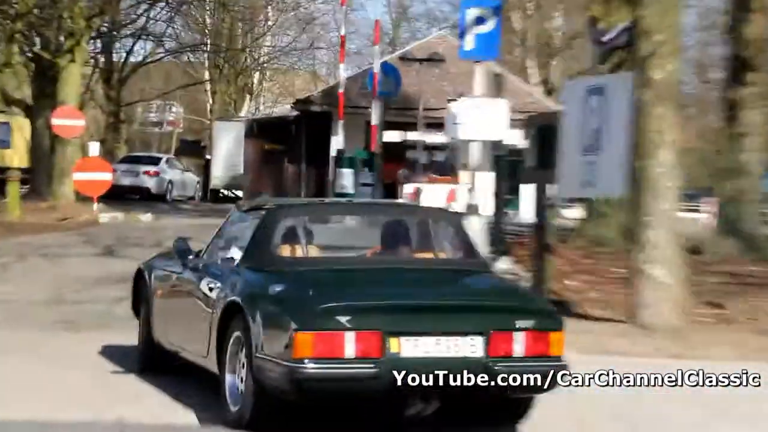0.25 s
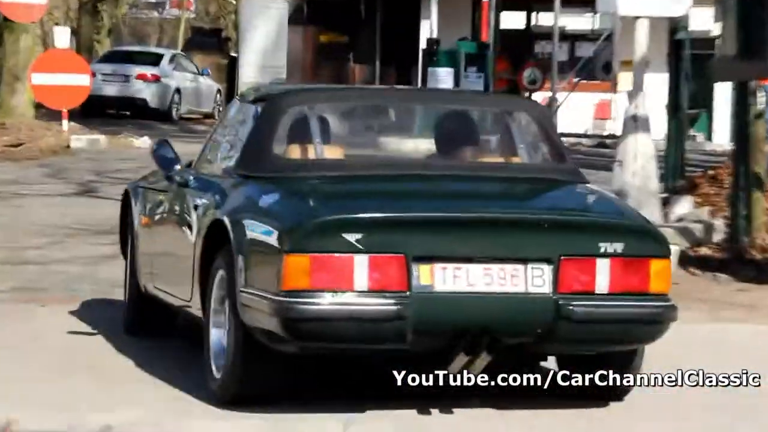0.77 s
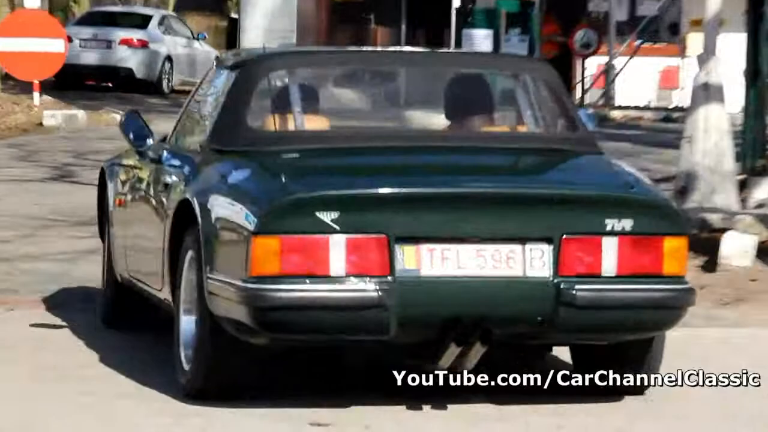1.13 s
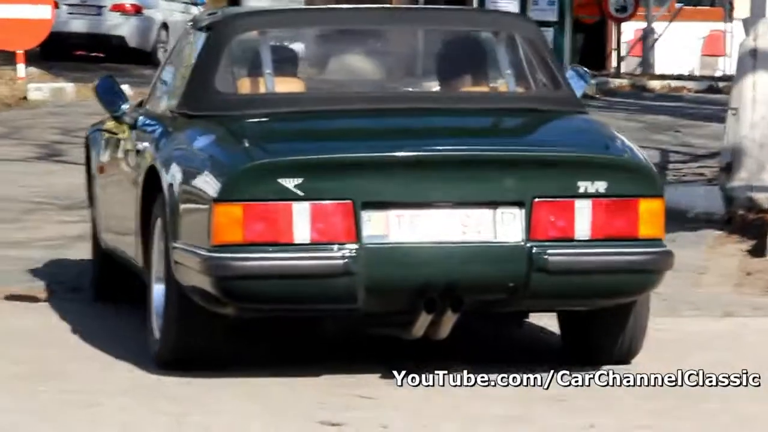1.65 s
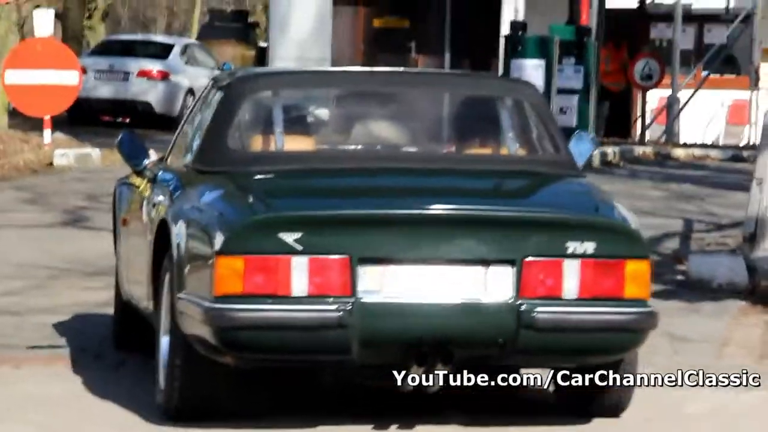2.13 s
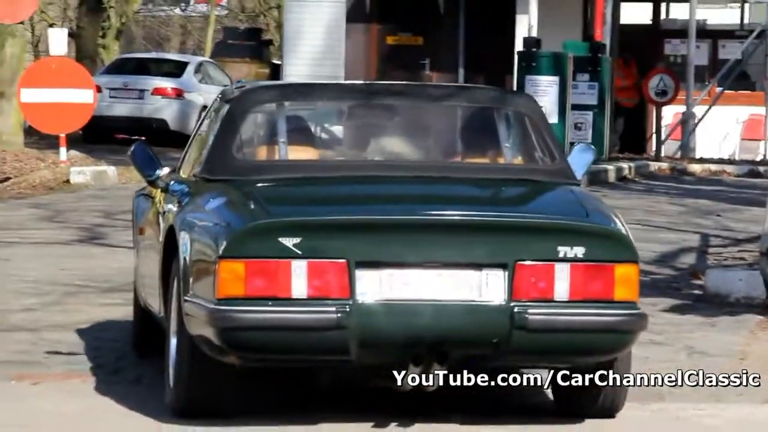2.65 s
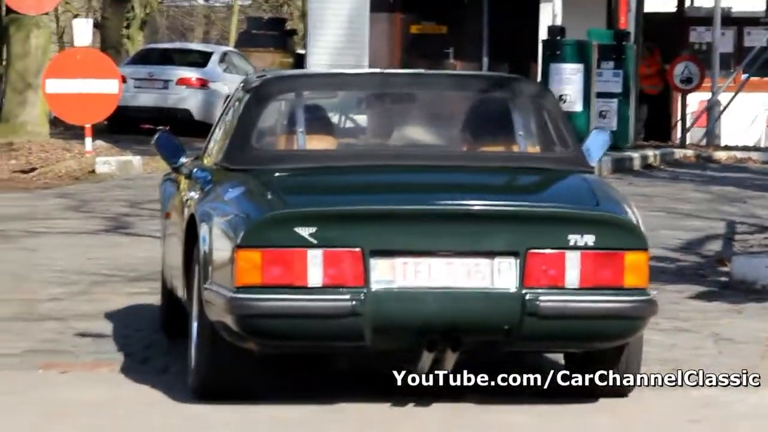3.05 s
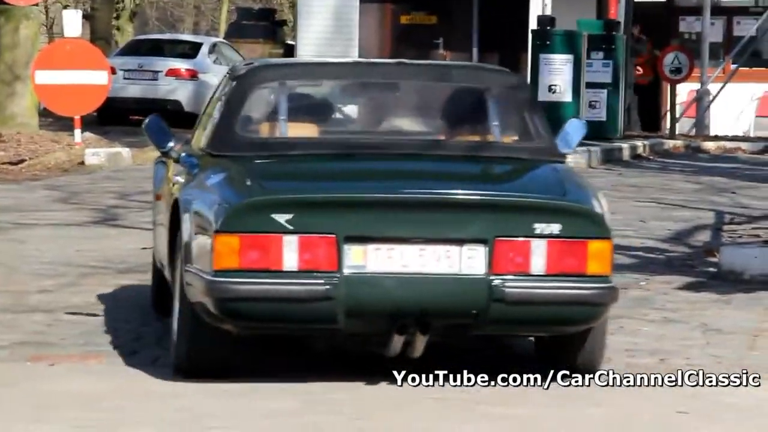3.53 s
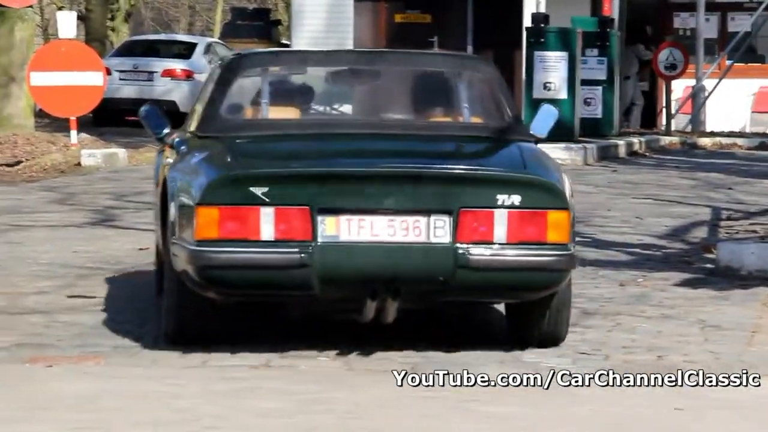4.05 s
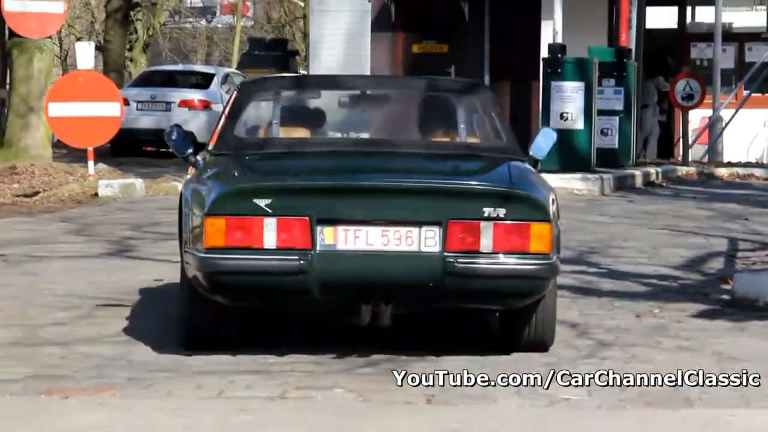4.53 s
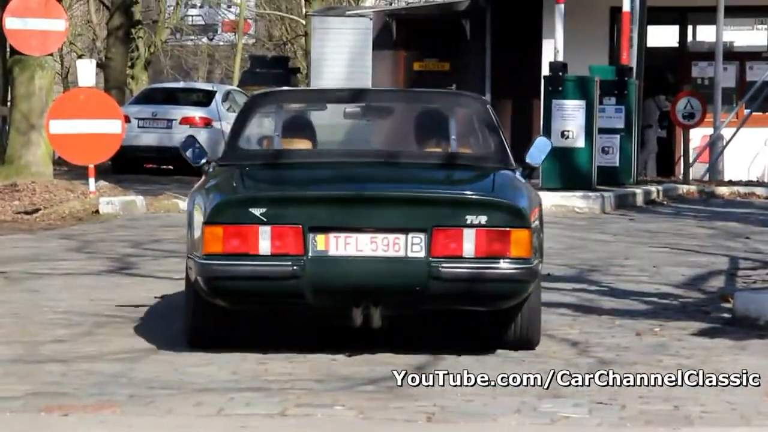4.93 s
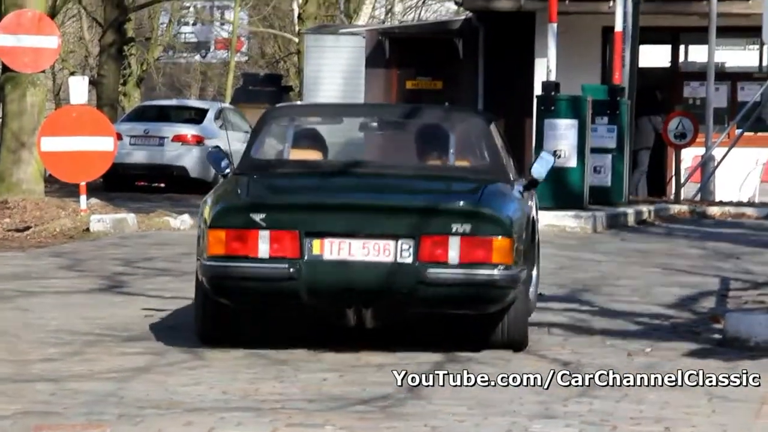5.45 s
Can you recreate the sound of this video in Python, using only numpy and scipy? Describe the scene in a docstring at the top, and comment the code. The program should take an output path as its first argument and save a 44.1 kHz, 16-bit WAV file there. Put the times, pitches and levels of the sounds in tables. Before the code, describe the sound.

At an outdoor roadside, a six-cylinder sports car burbles straight ahead, its uneven exhaust booming over lightly ticking valves. Another car passes close behind the stereo microphone on the left, with tyre roar and a brief coarse rasp. The sports car revs up, drops back, then revs again and rolls away at steady revs. Traffic noise drifts to the right while light wind rumbles on the microphone.

```python
"""At a roadside, a stereo microphone faces a six-cylinder sports car, its uneven firings booming in the
twin exhaust over ticking valve gear. From the start, light wind rumbles on the two microphone ports and
tyres roar close behind on the left, with a coarse rasp, a thin whine and a low hum, all gone in a second.
The sports car blips its throttle near 1.8 s and again near 4 s, then rolls away, while the traffic
crosses to the right. Just after 5 s a faint tick sounds on the left."""
import sys
import numpy as np
from scipy import signal
from scipy.io import wavfile
from scipy.ndimage import uniform_filter1d

SR = 44100
rng = np.random.default_rng(int(sys.argv[2]) if len(sys.argv) > 2 else 0)


def wav_record(signal):
    """Record a signal, one row per channel, as 16-bit PCM in the file named by sys.argv[1]."""
    frames = np.transpose(np.atleast_2d(signal))
    bounded = np.clip(frames, -1, 1)
    # unit amplitude maps onto the largest positive 16-bit level
    quanta = np.round(bounded * 32767).astype(np.int16)
    wavfile.write(sys.argv[1], SR, quanta)


N = 250488

# The sports car, straight ahead. Levels in all tables are relative.
# Engine speed. Each row: time in seconds, firings per second.
FIRING_RATE = [(0.0, 71), (0.22, 59), (0.42, 53.4), (0.54, 52), (0.9, 46), (1.07, 51.5), (1.25, 69),
               (1.41, 80.5), (1.48, 91), (1.58, 100), (1.7, 109), (1.8, 112.5), (1.88, 111.5), (1.99, 103),
               (2.12, 92), (2.24, 81.5), (2.37, 72), (2.59, 62), (2.83, 57), (3.03, 53), (3.16, 78),
               (3.3, 78), (3.45, 70), (3.65, 68), (3.88, 89), (4.05, 104), (4.25, 105.5), (4.33, 103),
               (4.43, 87.5), (4.84, 89.5), (5.0, 87), (5.14, 91), (5.33, 95), (5.68, 90.6)]
# How the engine burns. Each row: time in seconds, blow strength in dB, extra drive to the upper pipe
# modes in dB, how unlike the two banks fire from 0 to 1.
COMBUSTION = [(0.0, -26.5, -3, 0.4), (0.42, -24.5, -6, 0.44), (0.54, -35.5, -6, 0.55), (0.9, -24.5, -12, 1),
              (1.07, -18, -8, 0.4), (1.25, -16, -11.5, 0.24), (1.41, -19, -3, 0.5), (1.5, -15.5, -3, 0.5),
              (1.64, -14, -3, 0.7), (1.8, -16, 0.5, 0.96), (1.88, -19.5, -4.5, 0.84),
              (1.99, -15.5, -14.5, 0.17), (2.14, -12.5, -13, 0.95), (2.24, -14.5, -7.5, 0.8),
              (2.37, -15, -5, 0.44), (2.59, -22, -8.5, 0.36), (2.83, -22, -8.5, 0.57),
              (3.03, -25.5, -9, 0.2), (3.3, -26.5, -6.5, 0.98), (3.5, -26.5, -17, 1),
              (3.65, -24.5, -15, 0.99), (3.88, -21, -9.5, 1), (4.05, -25, -3.5, 0.96),
              (4.33, -28.5, -3.5, 0.94), (4.43, -20, -13, 0.8), (4.84, -24, -11, 0.77),
              (5.14, -24.5, -11.5, 0.75), (5.33, -20, -13.5, 0.8), (5.68, -22.5, -14.5, 0.5)]
# A few firings in a row burn harder. Each row: peak time in seconds, level change in dB, fade in seconds.
BURN_SURGES = [(.036, 12, 0.017), (.114, 10, 0.031), (.2, 7, 0.028), (.268, 8.5, .02), (.31, 9, 0.018),
               (.415, 6, 0.023), (.578, 9, .02), (.63, 8, .02), (.7, 14, 0.016), (.884, 2, 0.019),
               (.942, 6, 0.015), (1.231, 9, .03), (1.36, 6, 0.028), (1.404, 8.5, 0.027), (1.575, 1, 0.018),
               (1.752, 1.5, .01), (1.806, -3, .01), (1.858, 2.5, .012), (1.912, 6.5, .012),
               (1.966, 5.5, .015), (2.035, 1.5, .02), (2.54, 3, 0.012), (2.63, 6, 0.012),
               (2.715, 7.5, 0.034), (2.81, 7, .025), (2.91, 3.5, 0.029), (3.02, 0.5, .02),
               (3.05, -0.5, .03), (3.16, 7.5, 0.026), (3.241, 3, 0.016), (3.376, 5, 0.016),
               (3.59, 4.5, .03), (3.63, 4, 0.03), (3.72, 0, 0.03), (3.944, 10.5, 0.037), (4.078, 16, .045),
               (4.19, 15, .04), (4.298, 16, .036), (4.388, 7.5, 0.022), (4.53, 6, 0.04), (4.652, 1, 0.021),
               (4.711, 3.5, 0.021), (4.778, 10, .025), (4.895, 6.5, 0.019), (4.965, 4.5, 0.023),
               (5.037, 8.5, .02), (5.19, 9, 0.034), (5.307, 5.5, 0.019), (5.457, 8, 0.022),
               (5.578, 3.5, 0.044)]
# Each entry: one cylinder's strength in dB, in firing order, with the banks at their most unlike.
CYLINDER_STRENGTH_DB = [2.5, -14, -1.5, -5, -1.5, -12]
# Resonances of the pipes (low, then upper), the tailpipe shell and the engine casing.
# Each row: frequency in Hz, width in Hz, level in dB.
LOW_PIPE_MODES = [(114.6, 15.5, -13.5), (132.3, 54, -10), (152.4, 24.3, 1), (161, 110, -24)]
UPPER_PIPE_MODES = [(266, 51, -13), (308.3, 36.7, 4.5), (438, 33, -5.5)]
SHELL_MODES = [(876, 56, -1), (1088, 75, 0.5), (1330, 66, -4)]
CASING_MODES = [(1093, 40, -2), (1370, 45, -2), (1525, 43, -5.5)]
# Overtones of the firing tone under load. Each row: multiple of the firing rate, level in dB.
LOAD_OVERTONES = [(2, -7.5)]
# Loudness of the valve gear. Each row: time in seconds, level in dB.
VALVE_LEVEL = [(0, -30), (1.9, -23), (2.4, -23.5), (3.3, -23), (4.5, -27.5), (5.0, -32), (5.68, -28)]

# The road, behind the microphone. Each row: time in seconds, then in dB the tyre roar, its left-over-right
# balance, the swish, its left-over-right balance, the fizz.
TRAFFIC_PASS = [(0.0, -2, 5.5, 4.5, 7, 3.5), (0.45, 0.5, 7, 2, 9.5, 2.5), (0.65, -0.5, 6, 0.5, 7.5, 5.5),
                (1.12, 0.5, 10, 0.5, -0.5, 2.5), (1.44, -0.5, 3.5, 1, 1, -0.5), (1.9, -1.5, 3, 3, -0.5, 3),
                (2.3, 1.5, 3.5, 1, -0.5, -3.5), (3.1, 2, 1, -1.5, 2.5, -6.5), (3.88, 0.5, -2.5, -3, 1.5, 0),
                (4.19, 0, -4, -2, 3, -2.5), (4.25, 0, -3, -1.5, 2, -6.5), (4.6, 2, -4, -3, 2, -6.5),
                (5.5, -2, -6, -1, 1, -2.5), (5.68, -3.5, -2, 1.5, -8, -2.5)]
# Base spectrum of tyres on the road. Each row: frequency in Hz, level in dB.
ROAD_SPECTRUM = [(40, -33), (100, 5), (180, 1), (300, 1.5), (450, -2.5), (560, -2.5), (1070, -0.5),
                 (1330, -2), (1730, -5.5), (2480, -10.5), (2950, -16), (3700, -18), (4900, -22),
                 (6500, -22.5), (8500, -28), (14900, -38), (15700, -40)]
# Narrow bands in the nearest car's tyre noise. Each row: frequency in Hz, width in Hz, lift in dB.
TYRE_BANDS = [(3450, 200, 2.5), (3810, 110, 5)]
# How alike the road sounds at the two ports. Each row: frequency in Hz, likeness from 0 to 1 with the
# nearest car close, likeness once it has gone.
ROAD_LIKENESS = [(150, .95, .95), (290, .55, .2), (640, .18, .15), (900, .3, .1), (1250, .65, .4),
                 (1550, .6, .15), (2200, .7, .35), (4500, .4, .33), (8000, .36, .36), (15000, .38, .38)]
# Where each part of the road noise acts. Each row: the weight of its dB change at each of BAND_HZ.
BAND_HZ = [450, 1100, 2800, 3600, 4700, 6600, 11000]
BAND_WEIGHTS = {
    "roar": [0, 1, 1, 1, 1, 1, 0],
    "drone": [1, 0, 0, 0, 0, 0, 0],
    "swish": [.39, .39, 1.33, 2.5, .54, .89, .38],
    "fizz": [.19, .16, .35, .069, .67, 1, .043],
    "air": [0, 0, 0, 0, 0, 0, 1],
    "roar_pan": [.57, .88, .61, .42, .42, .61, .028],
    "swish_pan": [.091, .063, .29, 1, .31, .59, .44],
    "patches": [.77, .15, .1, .42, 1, .82, .96],
    "flicker": [.095, .8, 1.1, .58, .81, 1.6, 1.3]}
# Resonances in the nearest car's coarse rasp. Each row: frequency in Hz, width in Hz, level in dB.
BURR_MODES = [(455, 29, 4), (570, 57, -1), (800, 42, -1), (990, 95, 3.5), (1310, 90, -5)]

# Wind on the microphone ports. Each row: time in seconds, level in dB.
WIND_LEVEL = [(0.0, -37), (0.45, -46), (1.1, -34), (1.5, -56), (1.87, -44), (2.5, -38), (2.65, -34),
              (3.45, -34), (3.67, -39), (3.95, -31), (4.45, -32), (4.98, -32), (5.68, -40)]
# Spectrum of its rumble. Each row: frequency in Hz, level in dB.
WIND_SPECTRUM = [(10, -6), (30, 0), (48, -3), (75, -14), (120, -32), (400, -60)]

IDLE_RATE, LOAD_RATE = 91, 106  # firings per second: idling below, under full load above
LIGHT_BLOW_DB, HARD_BLOW_DB = -20, -12  # hard blows steady the burn and lift the tone even at idle
RAGGED_IDLE, RAGGED_LOAD = .7, .4  # the burn is more ragged off the throttle, 0 to 1
SIZE_SCATTER, TIME_SCATTER_S, GAS_DB = .5, .0013, -32  # each is scaled by the raggedness
LONG_PIPE_S = .0014  # one bank's delay, with the banks at their most unlike
GROWL_UNLIKE = .62  # share of the banks' difference that the upper pipe modes feel under load
SURGE_RISE_S, SURGE_GROWL, SURGE_TONE = .016, .38, .4  # rise; shares reaching the growl and the tone
LOPE_DB, LOPE_S = .7, .03  # small random swells between the surges
TONE_IDLE_DB, TONE_LOAD_DB, HARD_TONE_DB = -44, -31, 7
TONE_WAVER_DB, TONE_WAVER_S, OVERTONE_WAVER_DB, OVERTONE_WAVER_S = 2.5, .081, 3.5, .02
TONE_LAG = .23  # share of a firing by which the clean tone trails the pulses
STEEPEN = .65  # strong pressure crests sharpen in the pipe
NEAR_DRONE_DB, NEAR_AIR_DB, DRAW_OFF_S = 5, 8.5, .7  # the nearest car lifts lows and top until it leaves
SPREAD_S, LEFT_LEAD_S = 1.6, 4e-5  # time for the roar to widen; shared noise reaches the left port first
FLICKER_DB, FLICKER_S = .4, .015  # the treble flickers as a whole
BUFFET_DB, BUFFET_S, WIND_LIKENESS = 1.5, .04, .45  # quick lumps in the wind; likeness at the two ports
WHINE_TOP_S, WHINE_TOP_HZ, WHINE_LOW_HZ = .35, 15247, 11900
WHINE_CLIMB_HZ_PER_S, WHINE_FALL_S = 3400, .22
HUM_HZ, HUM_CLIMB_HZ_PER_S = 66.76, 15.6  # the pitch at its loudest moment, and its climb
RASP_DB, RETURN_DB, BURR_DB, WHINE_DB, HUM_DB, TICK_DB = -9.5, -19, -32, -64, -31, -47
DC_OFFSET, BAND_LIMIT_HZ = .007, 15750


def gain_of(db):
    """Decibels to gain."""
    return 10 ** (np.asarray(db) / 20)


def unit_rms(x):
    """Scales to rms 1."""
    return x / np.sqrt(np.mean(x ** 2) + 1e-20)


def spectrum_at(points, hz):
    """Reads a spectrum on a log frequency axis, as a column."""
    f, value = np.transpose(points)
    return np.interp(np.log(hz + 1), np.log(f + 1), value)[:, None]


def curves_at(rows, t):
    """Reads every column of a curve table at times t."""
    times, *curves = np.transpose(rows)
    return [np.interp(t, times, curve) for curve in curves]


def wander(seconds):
    """A random drift of rms 1 that changes over about the given time."""
    span = round(seconds * SR)
    return unit_rms(uniform_filter1d(uniform_filter1d(rng.standard_normal(N), span), span))


def butter(order, hz, kind):
    """A Butterworth filter as second-order sections."""
    return signal.butter(order, hz, kind, fs=SR, output="sos")


def ring(x, hz, width_hz):
    """One damped mode struck by the pulses in x."""
    radius, angle = np.exp(-np.pi * width_hz / SR), 2 * np.pi * hz / SR
    return signal.lfilter([np.sin(angle)], [1, -2 * radius * np.cos(angle), radius ** 2], x)


def resonate(x, modes):
    """A set of damped modes, all driven by x."""
    return sum(gain_of(db) * ring(x, hz, width) for hz, width, db in modes)


def knocks(modes, per_s, spread_db=3.5):
    """Random taps of uneven size ring a set of modes, each tap in its own mix."""
    taps = gain_of(spread_db * np.minimum(rng.exponential(1, N), 2.5))
    taps *= rng.random(N) < per_s / SR
    taps *= rng.choice([-1., 1.], N)
    return sum(gain_of(db) * unit_rms(ring(taps * rng.uniform(.3, 1, N), hz, width))
               for hz, width, db in modes)


def stereo_noise(shape_db, likeness, size=1024):
    """Noise partly alike at the two ports; its level and likeness are functions of (hz, t)."""
    hop = size // 4
    hz, t = np.fft.rfftfreq(size, 1 / SR), np.arange(N // hop + 5) * hop / SR
    a, b, c, d = rng.standard_normal((len(t), len(hz), 4)).T
    left, unrelated = a + 1j * b, c + 1j * d
    alike = np.clip(likeness(hz, t), 0, 1)
    delay = np.exp(-2j * np.pi * hz * LEFT_LEAD_S)[:, None]
    right = alike * left * delay + np.sqrt(1 - alike ** 2) * unrelated
    spectra = np.array([left, right]) * gain_of(shape_db(hz, t))
    return signal.istft(spectra, nperseg=size, noverlap=size - hop)[1][:, :N]


def firings(at, rate, unlike, chance):
    """One click a firing, sized and delayed by cylinder and by chance; slower firings are heavier."""
    count, pulses = np.arange(len(at)), np.zeros(N)
    late_s = LONG_PIPE_S * unlike[at] * (count % 2) + TIME_SCATTER_S * chance[:, 1]  # banks take turns
    size = gain_of(np.take(CYLINDER_STRENGTH_DB, count % 6) * unlike[at])
    size *= 1 + SIZE_SCATTER * chance[:, 0]
    pulses[np.clip(at + SR * late_s, 0, N - 1).astype(int)] = size / np.sqrt(rate[at] / 100)
    return pulses


def exhaust():
    """Straight ahead, uneven firings ring the pipes and the tailpipe shell over a clean firing tone."""
    t = np.arange(N) / SR
    rate, = curves_at(FIRING_RATE, t)
    blow_db, growl_db, unlike = curves_at(COMBUSTION, t)
    load = np.clip((rate - IDLE_RATE) / (LOAD_RATE - IDLE_RATE), 0, 1)
    hard = np.clip((blow_db - LIGHT_BLOW_DB) / (HARD_BLOW_DB - LIGHT_BLOW_DB), 0, 1)
    ragged = RAGGED_IDLE + (RAGGED_LOAD - RAGGED_IDLE) * np.maximum(load, hard)
    waver_db = TONE_WAVER_DB * ragged * wander(TONE_WAVER_S)

    cycles = np.cumsum(rate) / SR
    fired_at = np.flatnonzero(np.diff(np.floor(cycles)))
    chance = rng.uniform(-1, 1, (len(fired_at), 2)) * ragged[fired_at, None]
    surge_db = LOPE_DB * wander(LOPE_S)
    for peak_s, db, fade_s in BURN_SURGES:
        surge_db += db * np.exp(-((t - peak_s) / np.where(t < peak_s, SURGE_RISE_S, fade_s)) ** 2)
    pulses = firings(fired_at, rate, unlike, chance)
    steadier = firings(fired_at, rate, unlike * (1 - (1 - GROWL_UNLIKE) * load), chance)
    gas = gain_of(GAS_DB) * ragged * rng.standard_normal(N)  # turbulent flow between the pulses
    drive = gain_of(blow_db + surge_db) * (pulses + gas)
    upper_drive = gain_of(blow_db + growl_db + SURGE_GROWL * surge_db) * (steadier + gas)

    # an open tailpipe radiates little below its first mode; the silencer stops the highs
    boom = signal.sosfilt(butter(3, [108, 185], "band"), resonate(drive, LOW_PIPE_MODES))
    growl = signal.sosfilt(butter(2, [230, 480], "band"), resonate(upper_drive, UPPER_PIPE_MODES))
    rasp = signal.sosfilt(butter(2, 700, "high"), resonate(drive * gain_of(growl_db), SHELL_MODES))

    tone_db = TONE_IDLE_DB + (TONE_LOAD_DB - TONE_IDLE_DB) * load + HARD_TONE_DB * hard * (1 - load)
    tone_peak = np.sqrt(2) * gain_of(tone_db + waver_db + SURGE_TONE * surge_db)
    phase = 2 * np.pi * (cycles - TONE_LAG)
    overtones = sum(gain_of(db + OVERTONE_WAVER_DB * wander(OVERTONE_WAVER_S)) * np.sin(multiple * phase)
                    for multiple, db in LOAD_OVERTONES)
    overtones *= load * tone_peak * gain_of(growl_db)
    lows = gain_of(2.5) * boom + tone_peak * np.sin(phase)
    crests = signal.sosfiltfilt(butter(3, 190, "high"), lows ** 2)
    return lows + overtones + STEEPEN * crests + gain_of(.5) * growl + gain_of(RASP_DB) * rasp


def valve_clatter():
    """Valve gear ticks ring in the engine casing."""
    level_db, = curves_at(VALVE_LEVEL, np.arange(N) / SR)
    return gain_of(level_db - 14.5) * knocks(CASING_MODES, per_s=120)


def traffic():
    """Tyres roar from left to right behind the microphone, widening as the nearest car draws off."""
    def shape_db(hz, t):
        roar, roar_pan, swish, swish_pan, fizz = curves_at(TRAFFIC_PASS, t)
        weight = {part: spectrum_at(list(zip(BAND_HZ, row)), hz) for part, row in BAND_WEIGHTS.items()}
        level = spectrum_at(ROAD_SPECTRUM, hz) + weight["roar"] * roar
        level += weight["swish"] * swish + weight["fizz"] * fizz
        near = np.exp(-t / DRAW_OFF_S)
        singing = sum(db * np.exp(-((hz - centre) / width) ** 2) for centre, width, db in TYRE_BANDS)
        level += near * (weight["drone"] * NEAR_DRONE_DB + weight["air"] * NEAR_AIR_DB + singing[:, None])
        patches = rng.standard_normal((len(t), len(hz))).T  # parts of the spectrum swell and sink
        patches = uniform_filter1d(uniform_filter1d(patches, 30, axis=0), 16, axis=1)
        level += weight["patches"] * unit_rms(patches)
        flicker = np.interp(t, np.arange(N) / SR, wander(FLICKER_S))
        level += weight["flicker"] * FLICKER_DB * flicker
        balance = weight["roar_pan"] * roar_pan + weight["swish_pan"] * swish_pan
        return np.array([level + balance / 2, level - balance / 2])

    def likeness(hz, t):
        close, gone = (spectrum_at([(row[0], row[k]) for row in ROAD_LIKENESS], hz) for k in (1, 2))
        return gone + (close - gone) * np.exp(-(t / SPREAD_S) ** 2)
    return gain_of(-10.5) * stereo_noise(shape_db, likeness) / np.sqrt(512)


def passing_burr(fade_s=.68):
    """Close on the left, the nearest car's coarse rasp dies away."""
    fade = np.exp(-(np.arange(N) / SR / fade_s) ** 2)
    return gain_of(BURR_DB + np.array([[-3], [-9]])) * fade * knocks(BURR_MODES, per_s=160)


def wind():
    """Light wind buffets the microphone: a lumpy low rumble, partly unrelated at the two ports."""
    rumble = stereo_noise(lambda hz, t: spectrum_at(WIND_SPECTRUM, hz),
                          lambda hz, t: WIND_LIKENESS, size=4096)
    level_db, = curves_at(WIND_LEVEL, np.arange(N) / SR)
    return gain_of(level_db + BUFFET_DB * wander(BUFFET_S)) * unit_rms(rumble)


def roadside_echoes(x, decay_s=.5):
    """Walls and trees return a short sparse tail, different at each port."""
    t = np.arange(SR // 2) / SR
    taps = rng.choice([-1., 1.], (2, len(t))) * (rng.random((2, len(t))) < .04)
    taps *= (t > .015) * gain_of(-60 * t / decay_s)  # nothing returns in the first 15 ms
    return signal.fftconvolve(x[None], taps / np.linalg.norm(taps[0]), axes=1)[:, :N]


def passing_whine(start_s=.1, end_s=.72):
    """On the left, the passing car's thin unsteady whine climbs, then falls away."""
    t = np.arange(N) / SR
    since_top = t - WHINE_TOP_S
    fall = 1 - np.exp(-np.maximum(since_top, 0) / WHINE_FALL_S)
    hz = WHINE_TOP_HZ + WHINE_CLIMB_HZ_PER_S * np.minimum(since_top, 0)
    hz -= (WHINE_TOP_HZ - WHINE_LOW_HZ) * fall
    hz += 140 * unit_rms(uniform_filter1d(rng.standard_normal(N), 300))  # the pitch wavers
    fade = np.clip(np.minimum(end_s - t, t - start_s) * 10, 0, 1)
    tone = np.sqrt(2) * np.sin(2 * np.pi * np.cumsum(hz) / SR)
    return gain_of(WHINE_DB + np.array([[3], [-5]])) * fade * tone


def passing_hum(loudest_s=.4):
    """Another engine goes by on the left: its low climbing note fades in, sags and fades out."""
    t = np.arange(N) / SR
    since = t - loudest_s
    fade = np.interp(t, [.28, loudest_s, .9, 1.0], [0, 1, gain_of(-5), 0])
    tone = np.sqrt(2) * np.sin(2 * np.pi * (HUM_HZ * since + HUM_CLIMB_HZ_PER_S * since ** 2 / 2))
    return gain_of(HUM_DB + np.array([[1.5], [-1.5]])) * fade * tone


def tick(start_s=5.0515, decay_s=.03):
    """A faint, brief burst of bright noise, mostly at the left port."""
    out, t = np.zeros(N), np.arange(600) / SR
    bright = np.diff(rng.standard_normal(len(t) + 1))
    out[round(start_s * SR):][:len(t)] = gain_of(TICK_DB - 60 * t / decay_s) * bright
    return out * gain_of([[1.5], [-8]])


def scene():
    """From the roadside: the sports car ahead with its echoes, the road behind, wind on the microphone."""
    car = exhaust() + valve_clatter()
    car = car * gain_of([[-.4], [.4]]) + gain_of(RETURN_DB) * roadside_echoes(car)
    return car + traffic() + passing_hum() + passing_burr() + passing_whine() + wind() + tick()


def record(dry):
    """The recorder adds a small steady offset, then cuts the highest treble."""
    lowpass = signal.firwin(1023, BAND_LIMIT_HZ, window=("kaiser", 9), fs=SR)
    return signal.oaconvolve(dry + DC_OFFSET, lowpass[None], "same")


dry = scene()
out = record(dry)
wav_record(out)
```